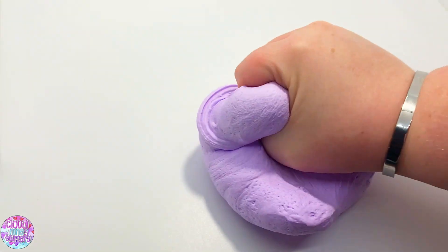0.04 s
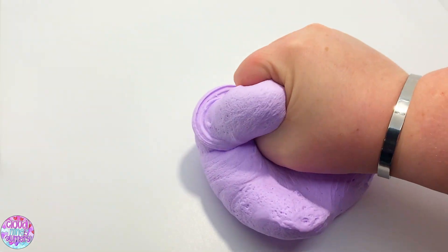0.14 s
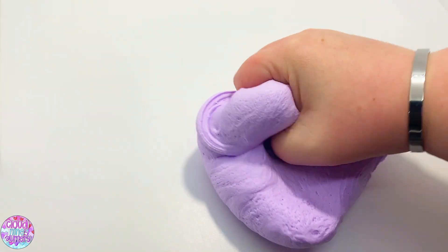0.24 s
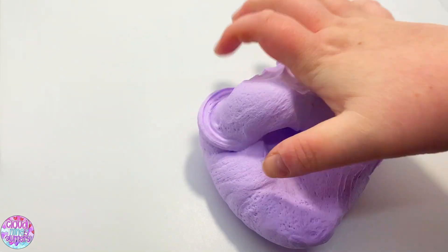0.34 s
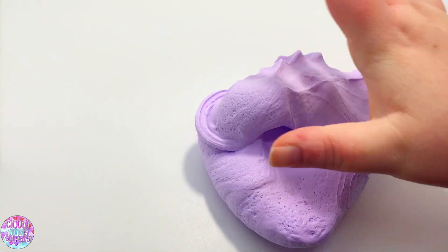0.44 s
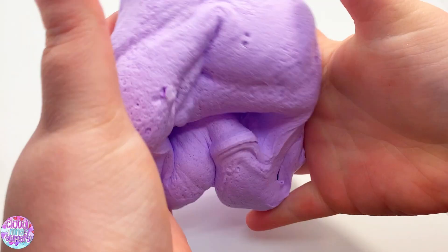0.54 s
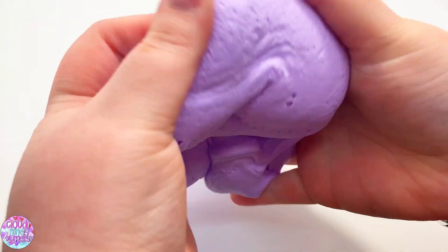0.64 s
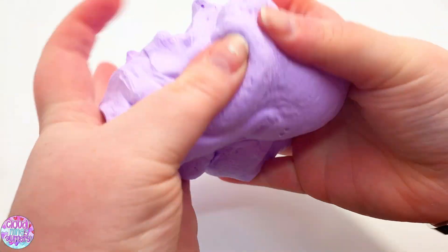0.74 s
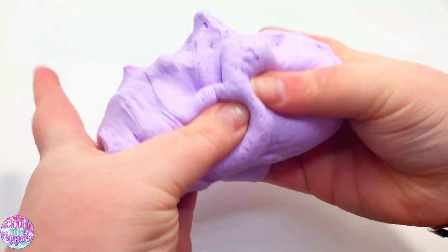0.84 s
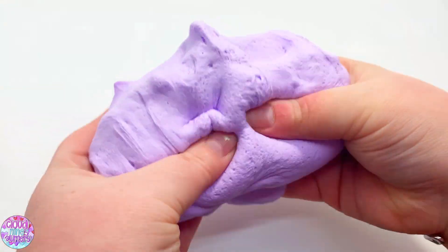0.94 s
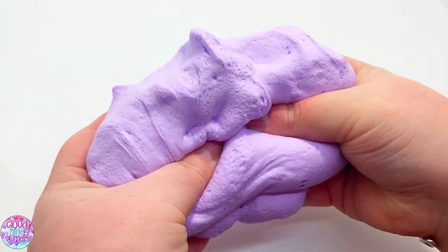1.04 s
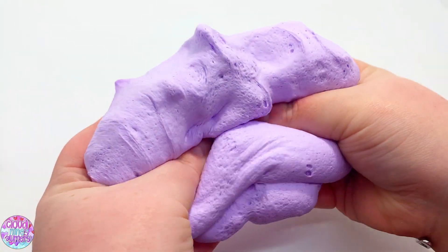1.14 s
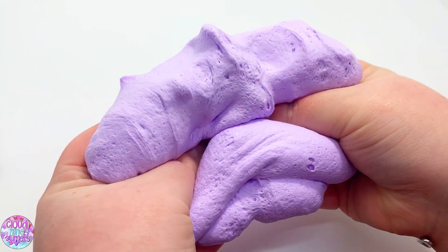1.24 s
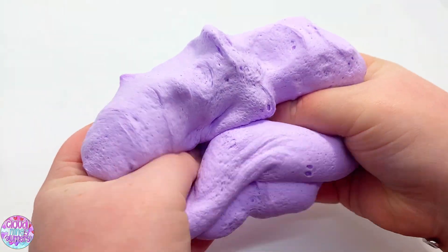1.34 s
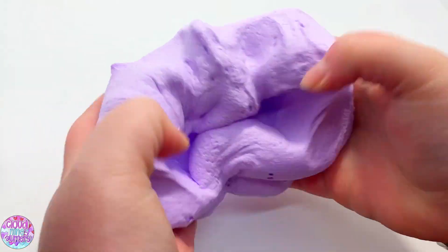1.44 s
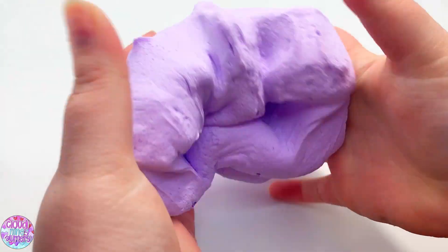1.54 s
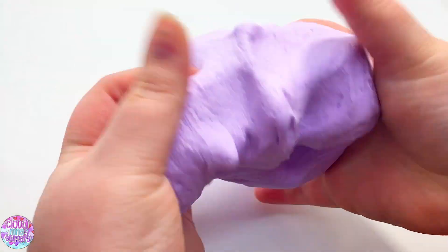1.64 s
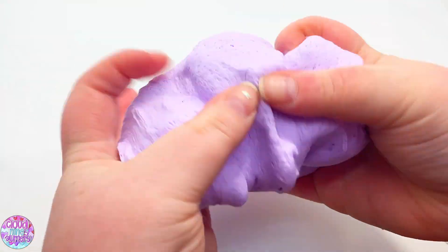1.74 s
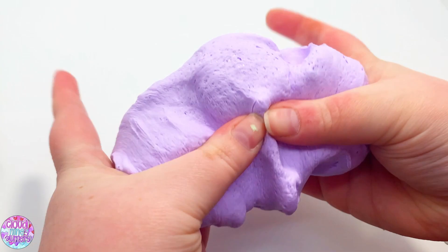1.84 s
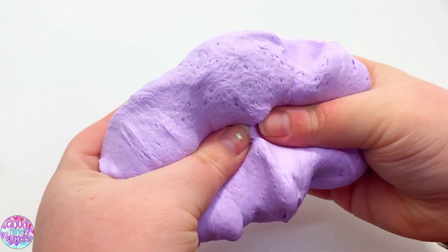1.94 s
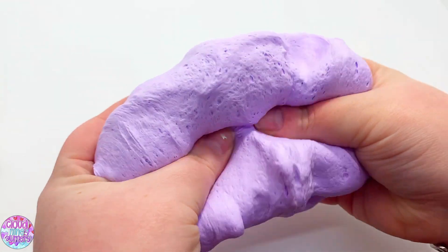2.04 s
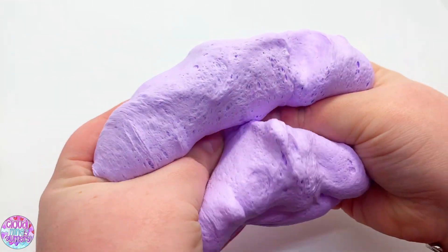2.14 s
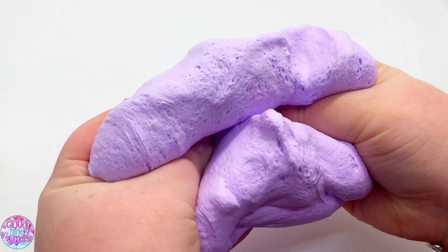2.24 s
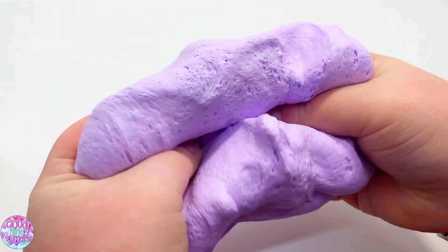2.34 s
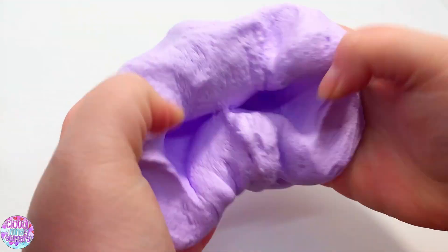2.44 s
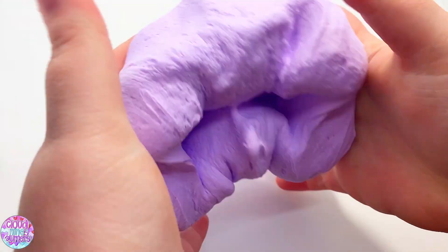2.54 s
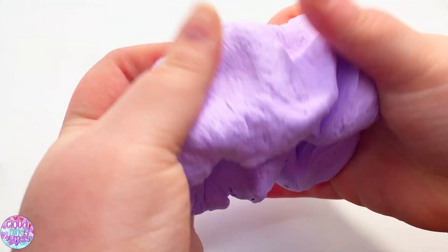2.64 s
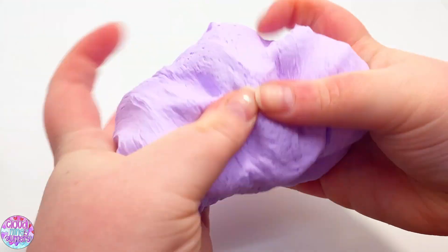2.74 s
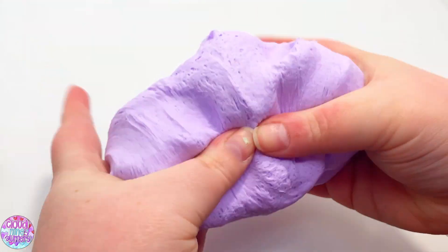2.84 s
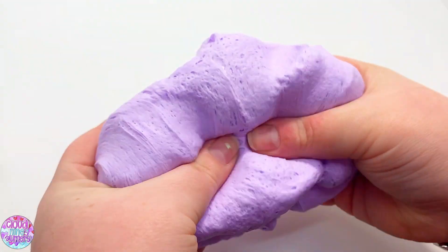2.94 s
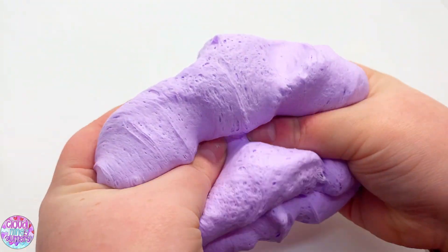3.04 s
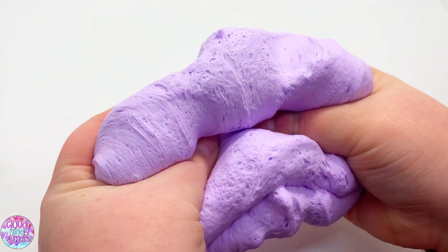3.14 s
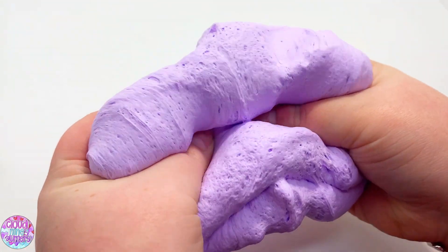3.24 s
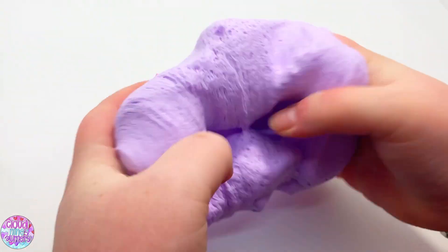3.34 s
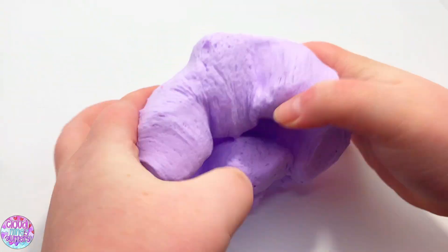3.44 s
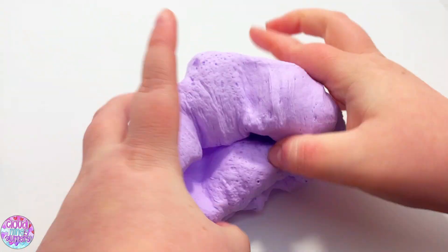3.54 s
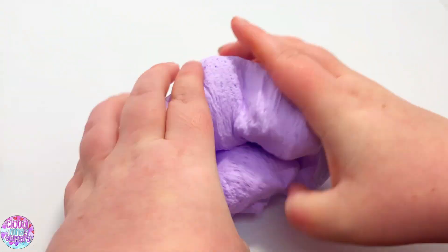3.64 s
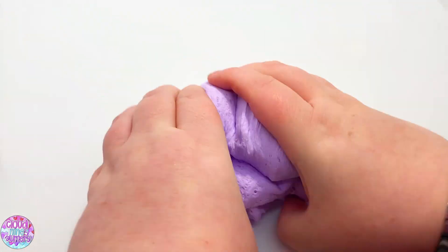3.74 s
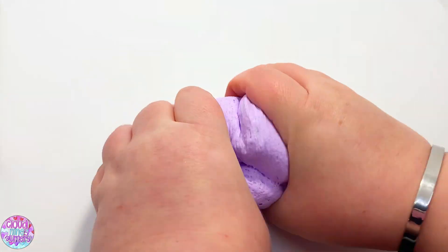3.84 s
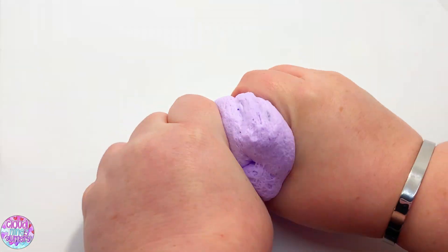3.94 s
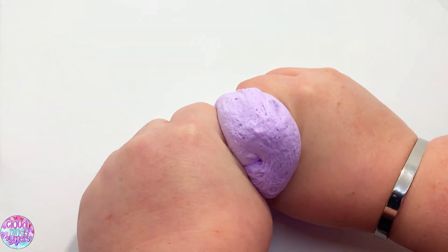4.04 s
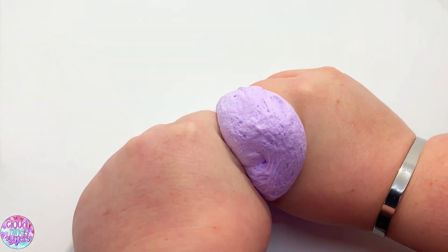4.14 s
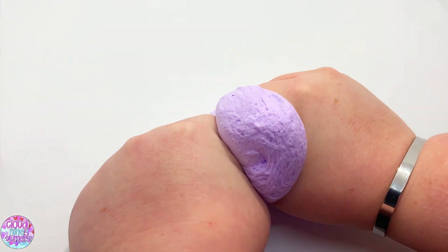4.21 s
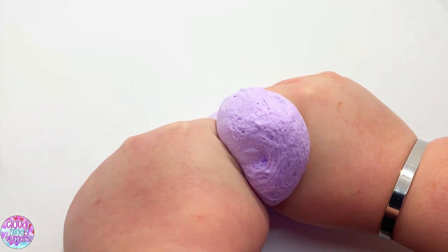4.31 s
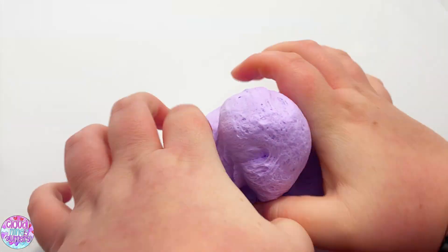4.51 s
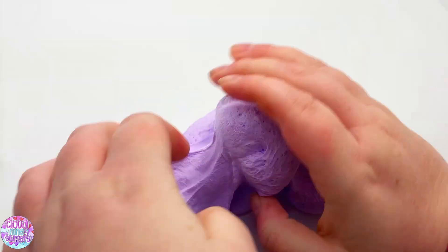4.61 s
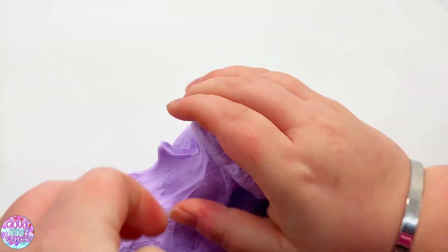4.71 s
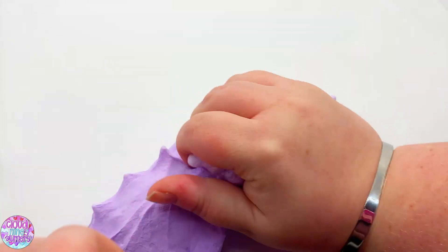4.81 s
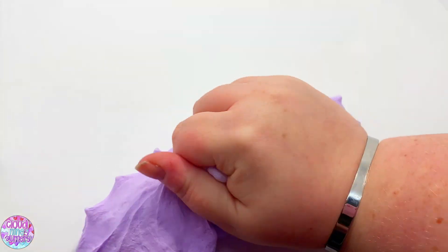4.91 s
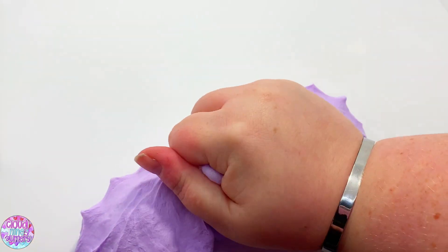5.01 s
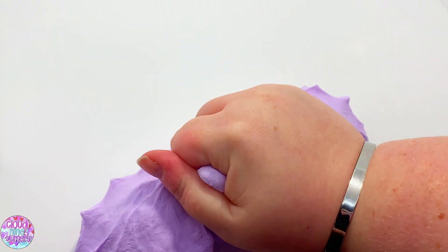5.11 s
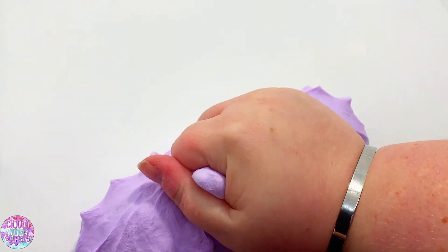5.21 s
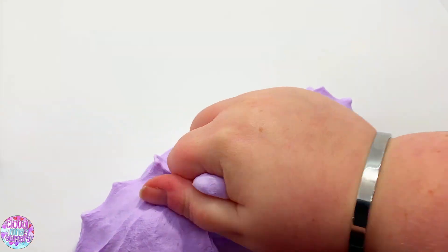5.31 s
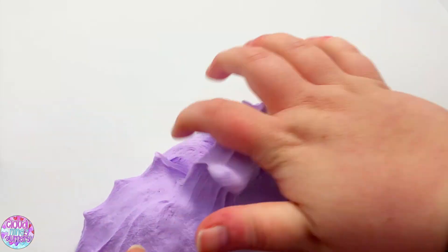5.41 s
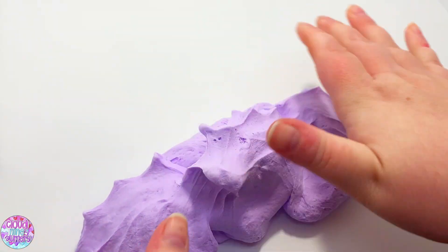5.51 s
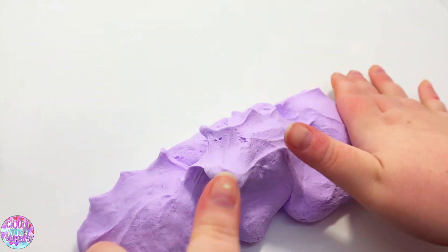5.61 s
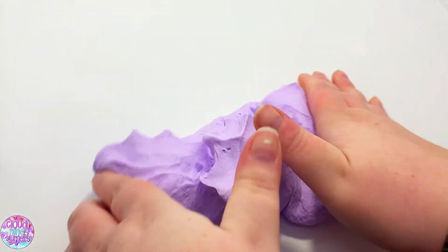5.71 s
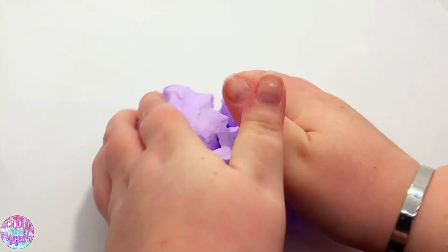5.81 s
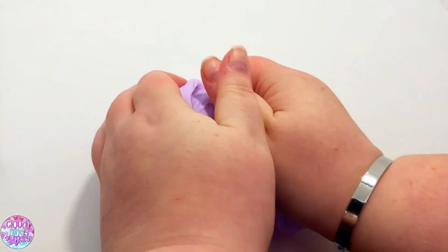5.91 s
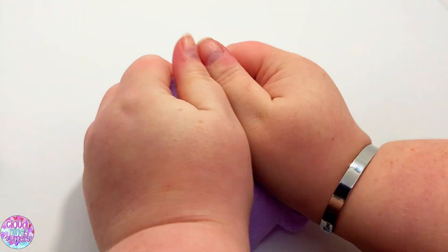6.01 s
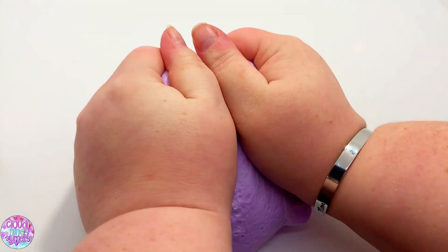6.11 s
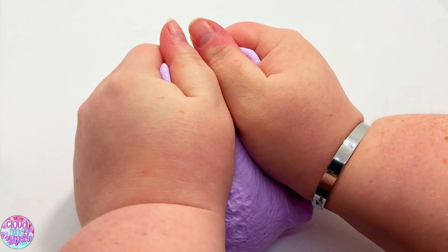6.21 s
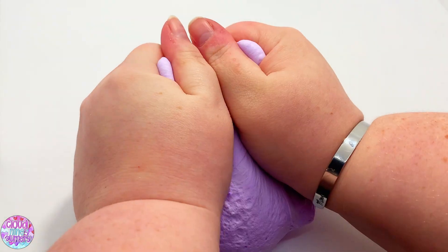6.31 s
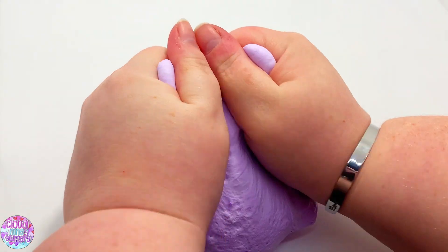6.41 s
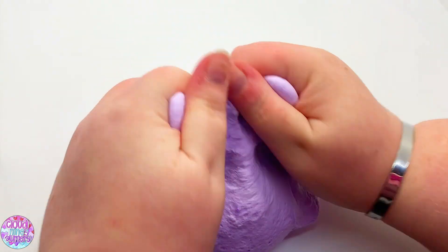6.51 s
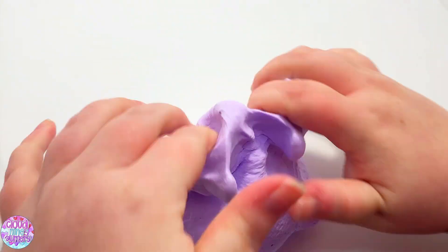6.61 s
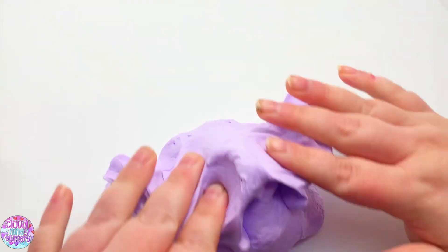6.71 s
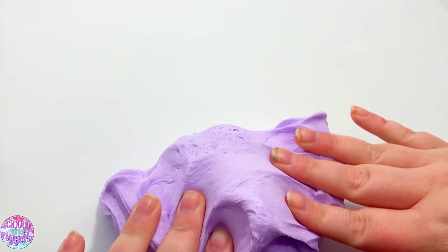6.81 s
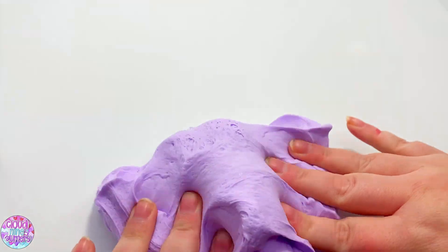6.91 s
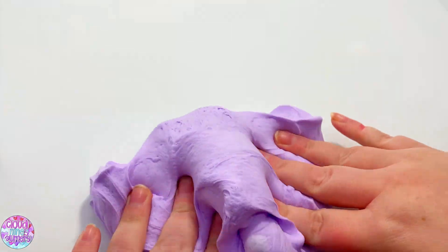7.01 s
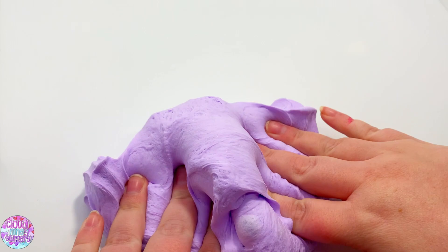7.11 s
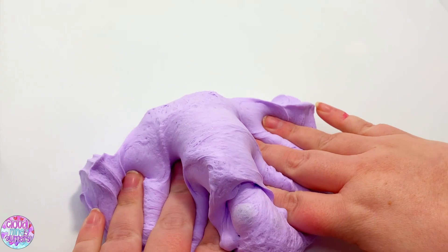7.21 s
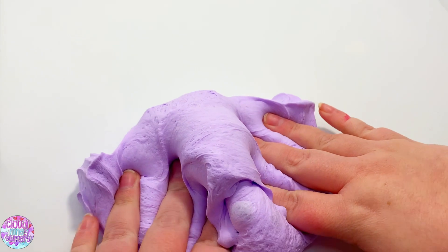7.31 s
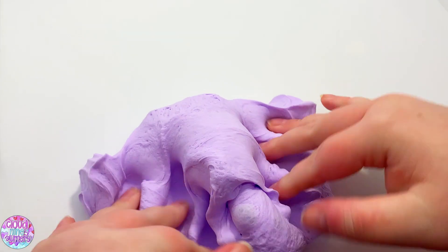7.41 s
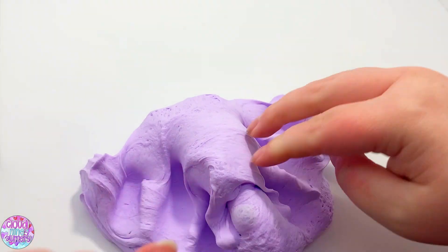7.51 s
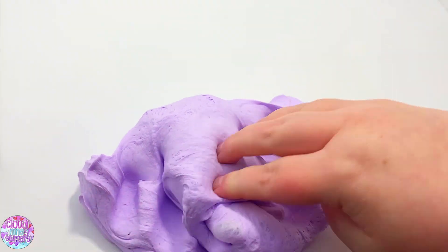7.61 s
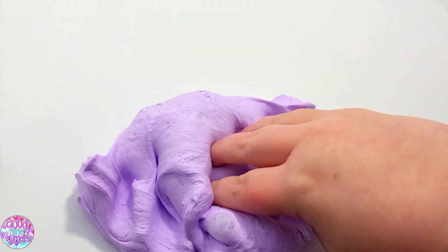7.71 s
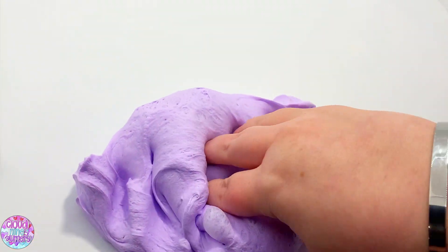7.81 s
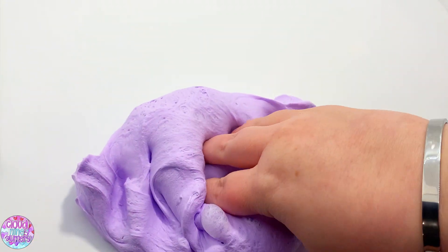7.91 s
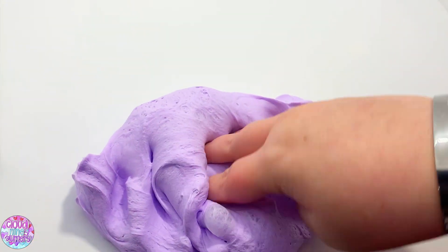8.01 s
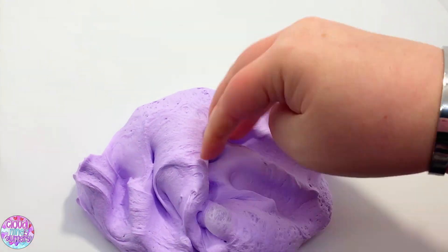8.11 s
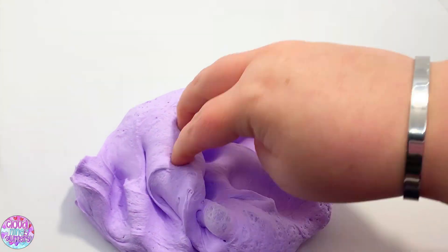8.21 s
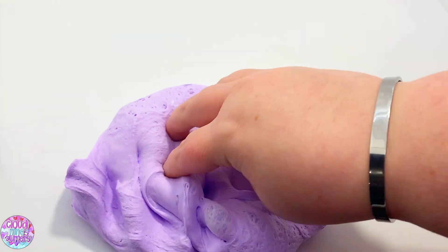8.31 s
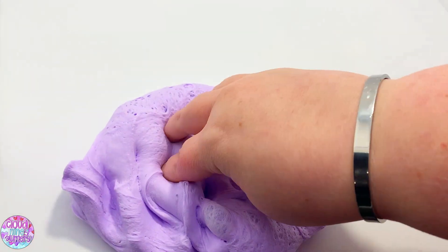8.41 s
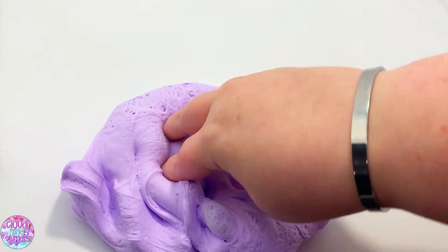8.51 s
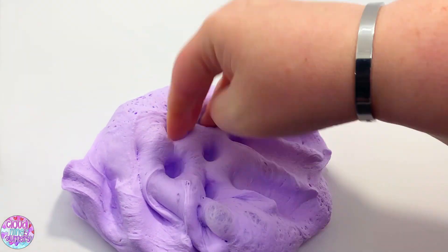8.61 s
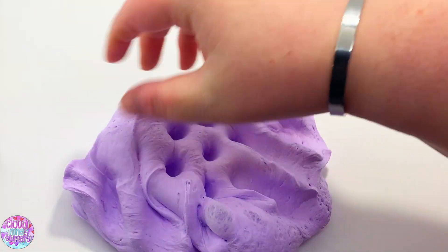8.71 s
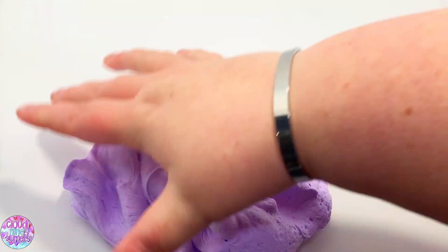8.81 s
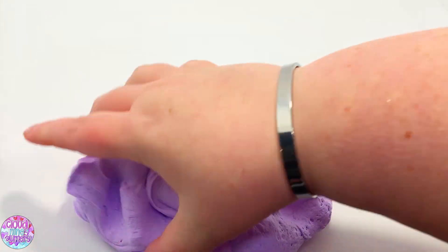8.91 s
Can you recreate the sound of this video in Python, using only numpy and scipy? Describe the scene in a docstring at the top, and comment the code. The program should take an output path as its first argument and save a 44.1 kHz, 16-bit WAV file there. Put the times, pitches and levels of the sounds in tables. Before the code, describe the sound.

Soft airy slime squeezed and kneaded close up, with fizzy crackles, wet squelches and sharp little bubble pops over a faint low room hum.

```python
"""On a table top in a quiet, humming room: hands knead soft airy slime close by, heard in wide stereo.
Squeezing fizzes with filtered noise broken up by random cell bursts, and sticky skin peels with the same bursts.
Larger pockets pop as ragged noise clicks with a short ring of air; cavities squelch as wavering low noise.
Decaying sines make the thuds on the table and the gulps of closing cavities. Unsteady mains tones and a low
rumble lie underneath, and the walls answer the slime with a short noise tail."""
import sys
import numpy as np
from scipy import signal
from scipy.fft import rfft, irfft, next_fast_len
from scipy.io import wavfile
from scipy.ndimage import uniform_filter1d, map_coordinates

SR = 44100
rng = np.random.default_rng(int(sys.argv[2]) if len(sys.argv) > 2 else 0)


def put_to_file(sound):
    """Save the sound as 16-bit audio at rate SR, in the file named by the first command-line argument."""
    columns = np.atleast_2d(sound).T  # one column per channel
    safe = np.clip(columns, -1, 1)
    whole_steps = np.round(safe * 32767)
    wavfile.write(sys.argv[1], SR, whole_steps.astype(np.int16))


N = 394694

# colour of the tiny bursting cells: freq_hz, relative_level_db
FIZZ_COLOUR = [(7400, -32.5), (8000, 5.5), (8900, 1.5), (10200, 3.5), (12000, 6), (15600, 0),
               (16000, -41.5)]
# colour of dry skin coming unstuck: freq_hz, relative_level_db
PEEL_COLOUR = [(500, -43), (1000, -8.5), (2000, -6.5), (3600, -0.5), (5500, -2.5), (7600, 3.5),
               (8600, -41.5)]
# colour of wet peeling and of big pockets: freq_hz, relative_level_db
WET_COLOUR = [(500, -10.5), (1000, 0), (2200, -1.5), (4000, -5), (8200, -24)]
# low colour of closing cavities: freq_hz, relative_level_db
SQUELCH_COLOUR = [(120, -3.5), (190, 3), (290, -6), (450, 1), (700, -16.5), (1200, -23.5)]


def amp(db):
    """Gain of a level in dB."""
    return 10 ** (np.asarray(db) / 20)


def unit(x):
    """x at rms 1."""
    return x / np.sqrt(np.mean(x ** 2) + 1e-20)


def along(points, hz):
    """Values of (Hz, value) points read on a log frequency axis."""
    f, v = np.transpose(points)
    return np.interp(np.log(hz + 1), np.log(f + 1), v)


def curves(rows):
    """One value per sample for each column after the time."""
    s, *cols = np.transpose(rows)
    return [np.interp(np.arange(N) / SR, s, c) for c in cols]


def wobble(rate):
    """A smooth random curve through normal draws, rate knots a second."""
    knots = rng.standard_normal(int(N * rate / SR) + 4)
    return map_coordinates(knots, [np.arange(N) * rate / SR])


def filtered(x, response):
    """x shaped by a complex response of frequency."""
    m = next_fast_len(N + 8192)
    return irfft(rfft(x, m) * response(np.fft.rfftfreq(m, 1 / SR)), m)[..., :N]


def noise(colour):
    """Coloured noise of rms 1."""
    return unit(filtered(rng.standard_normal(N), lambda hz: amp(along(colour, hz))))


def fading(ticks, t60):
    """Every tick leaves a tail that falls by 60 dB in t60 seconds."""
    return signal.lfilter([1], [1, -amp(-60 / (t60 * SR))], ticks)


def crackle(rate, spread_db, t60, bed):
    """Envelope of rms 1: random cells burst (rate a second), few large and many small, over a steady bed."""
    chance, size = rng.random(N), rng.exponential(1, N)
    bursts = (chance < rate / SR) * amp(spread_db * np.minimum(size, 2.8))
    return unit(bed + unit(fading(bursts, t60)))


def effort():
    """Levels of fizz, peel, squelch in dB: each squeeze rises, sags or swells while held, is let go and settles."""
    # slow creep of the slime between squeezes, ahead of the layer gains: time_s, fizz_level_db
    creep = [(0, -65.5), (.44, -97), (.5, -65), (.72, -62), (1.6, -73), (1.8, -60.5), (2.22, -62.5),
             (3.18, -84), (3.62, -60.5), (4.66, -75.5), (5.9, -62.5), (7.1, -63.5), (7.23, -85),
             (7.88, -77.5), (8.2, -64), (8.45, -76), (8.95, -103)]
    # squeezes, pokes and pulls, levels ahead of the layer gains: full_strength_s, rise_s, length_s,
    # sag_db_per_s (of fizz and peel, negative swells), fizz_level_db, peel_level_db, squelch_level_db
    squeezes = [(0.031, 0.087, 0.012, 57, -46, -73, -101), (0.191, 0.03, 0.1, 85, -40.5, -39, -41.5),
                (0.657, 0.024, 0.035, 98, -45, -51.5, -50.5), (1.338, 0.067, 0.022, 56, -41.5, -45, -45),
                (1.378, 0.045, 0.13, 34, -51, -72, -85), (1.497, 0.063, 0.0255, 48, -52, -48.5, -48.5),
                (1.695, 0.22, 0.095, 22, -53, -59, -55.5), (2.316, 0.027, 0.2, 62.5, -42.5, -44.5, -44.5),
                (2.671, 0.13, 0.023, 61, -49, -54.5, -53), (2.861, 0.162, 0.26, 36, -56.5, -61.5, -77.5),
                (3.262, 0.039, 0.28, 64, -40.5, -42.5, -41.5), (3.801, 0.22, 0.53, 36.5, -46.5, -53, -62),
                (4.036, 0.063, 0.084, 78, -37, -49, -63.5), (4.371, 0.1, 0.1, 79.5, -37, -37, -38.5),
                (4.782, 0.075, 0.25, -8, -46.5, -53.5, -62), (5.092, 0.024, 0.041, 108, -42, -60, -70),
                (5.227, 0.018, 0.046, 21, -39.5, -49, -54), (5.311, 0.075, 0.082, 127.5, -42.5, -44, -45),
                (5.459, 0.01, 0.048, 69, -86, -49, -51.5), (5.63, 0.21, 0.16, 52, -50.5, -47, -54),
                (5.886, 0.018, 0.14, 91, -45.5, -52, -62.5), (6.043, 0.17, 0.023, 93.5, -36.5, -44.5, -56),
                (6.179, 0.11, 0.015, 44, -42, -47, -59.5), (6.372, 0.021, 0.043, 61.5, -44, -54, -82),
                (6.423, 0.031, 0.24, 71, -41, -42, -45), (6.856, 0.018, 0.028, 56, -49.5, -51.5, -69),
                (7.315, 0.021, 0.058, 90.5, -35, -34, -33.5),
                (8.005, 0.064, 0.046, 101, -42.5, -41.5, -39.5),
                (8.534, 0.0355, 0.042, 46, -46, -39.5, -38), (8.87, 0.047, 0.089, -10, -42.5, -44.5, -47.5)]
    rise_db, release_db_s = 29.5, 507  # climb within the rise time; fall when the fingers let go
    settle_db, settle_db_s = -23, 118.5  # the slime goes on settling, fainter and slower
    sag_factors = np.array([[1], [1], [1.25]])  # the squelch changes faster than the fizz while held
    squelch_lag_s = 0.01  # cavities answer a little after the fizz

    creep_db, = curves(creep)
    # the peel creeps 4 dB below the fizz; the resting squelch is steady and faint
    resting_db = np.array([creep_db, creep_db - 4, np.full(N, -69.5)])
    power = amp(2 * resting_db)
    for s, rise, length, sag, *levels in squeezes:
        at = slice(max(round((s - 2 * rise) * SR), 0), round((s + length + .5) * SR))
        t = np.arange(N)[at] / SR - s
        after = np.maximum(t - length, 0)
        climb_db = rise_db * np.minimum(t, 0) / rise
        held_db = climb_db - sag_factors * sag * np.clip(t, 0, length)
        let_go_db = np.maximum(-release_db_s * after, settle_db - settle_db_s * after)
        power[:, at] += amp(2 * (np.array(levels)[:, None] + held_db + let_go_db))
    power[2] = np.interp(np.arange(N) - squelch_lag_s * SR, np.arange(N), power[2])
    return 10 * np.log10(power)


def patchy(x, depth_db):
    """Cavities open and close: coloured patches of gain drift through the sound, back at rms 1."""
    z = signal.stft(x, nperseg=512)[2]
    field = uniform_filter1d(rng.standard_normal(z.shape), size=5, axis=0)  # smooth across pitch
    field = uniform_filter1d(field, size=7, axis=1)  # and along time
    return unit(signal.istft(z * amp(depth_db * unit(field)), nperseg=512)[1][:N])


def kneading():
    """Fizz and peel share the same cell bursts; where fizz is weak beside peel, the peel turns wet and dark."""
    fizz_db, peel_db, squelch_db = effort()
    ticks = crackle(rate=70, spread_db=3.3, t60=.008, bed=.6)
    wet = np.clip(.6 - (fizz_db - peel_db) / 14, 0, 1)
    lumps = amp(2.2 * wobble(90))
    cells = wet * lumps + (1 - wet) * ticks  # wet slime slides in coarse lumps, dry slime ticks
    fizz = amp(fizz_db + 4.0) * cells * noise(FIZZ_COLOUR)
    skin = np.sqrt(wet) * noise(WET_COLOUR) + np.sqrt(1 - wet) * noise(PEEL_COLOUR)
    peel = amp(peel_db + 2.5) * cells * patchy(skin, depth_db=2.5)
    squelch = amp(squelch_db + 4.15 * wobble(60)) * noise(SQUELCH_COLOUR)
    return fizz, peel + squelch


def room_tone():
    """Unsteady mains tones over a rumble, nearly alike in both channels; now and then it all dips."""
    # mains hum and its overtones: pitch_hz, relative_level_db
    mains = [(60, -6.5), (120, -6), (180, -18)]
    # colour of the low rumble: freq_hz, relative_level_db
    rumble = [(20, -16.5), (59, 0.5), (91, -15.5), (129, -10), (290, -37.5), (467, -39), (750, -52.5)]
    # moments when the level dips briefly: centre_s
    hum_dips = [0.0, 1.43, 2.78, 4.15, 4.28, 5.18, 6.31, 6.82]
    dip_db, dip_s = -23, 0.048  # depth and half width of a dip
    t = np.arange(N) / SR
    tones = np.zeros(N)
    for hz, db in mains:
        level = amp(db + 3 * wobble(5.1))
        tones += level * np.sin(2 * np.pi * hz * t + 0.46 * wobble(8.3))
    shared = tones + amp(-1.5) * noise(rumble)
    apart = amp(-13.5) * noise(rumble)  # opposite in the two channels
    dips = sum(dip_db * np.exp(-((t - s) / dip_s) ** 2) for s in hum_dips)
    return amp(-55.0 + dips + 0.73 * wobble(2.7)) * np.array([shared + apart, shared - apart])


def pops():
    """A pocket snaps, tears open in a ragged volley of clicks, and the air inside rings for a few cycles."""
    # bursting air pockets, levels ahead of the layer gains:
    # start_s, skin_level_db, body_level_db (against the skin), air_pitch_hz (at the onset)
    pockets = [(0.2014, -31.5, -5, 1240), (0.4857, -31, -19.5, 6460), (0.6614, -33.5, -27, 2660),
               (0.79, -40, -2.5, 4060), (1.314, -26.5, -9.5, 5070), (1.486, -28, -17.5, 1610),
               (1.6103, -36.5, 1.5, 2980), (1.817, -26, -31.5, 1970), (2.162, -28, -10.5, 5860),
               (2.324, -13.5, -14.5, 6160), (2.9533, -31, -5, 4220), (3.628, -27.5, -15, 2380),
               (3.665, -24, -16, 1520), (3.776, -31.5, -11, 5000), (3.797, -19, -11, 6600),
               (3.8594, -33.5, -3, 1350), (3.884, -19.5, -27, 4280), (3.953, -24.5, -39, 4620),
               (4.028, -11, -16.5, 6600), (4.065, -23, -20.5, 4840), (4.088, -19.5, -26, 6860),
               (4.155, -24.5, -37, 6000), (4.213, -4.5, -28, 5230), (4.228, 0, -22.5, 6040),
               (4.33, -28.5, -11, 2880), (4.362, -16, -24, 1690), (4.481, -23, -2, 3470),
               (4.5829, -33.5, -4.5, 3760), (4.771, -26.5, -6, 4700), (4.809, -18, -17.5, 2230),
               (4.818, -24, 0, 6880), (4.852, -18, -15.5, 3520), (4.8713, -17, -17.5, 5750),
               (4.897, -16.5, -15.5, 6500), (4.918, -25, -12.5, 5000), (4.94, -11.5, -11.5, 6600),
               (4.977, -19.5, -14.5, 7400), (5.003, -18, -14.5, 3600), (5.03, -29, -3, 4300),
               (5.0421, -17, -11.5, 3800), (5.0754, -14.5, -15.5, 4430), (5.132, -17, -20.5, 5500),
               (5.2055, -25.5, -24.5, 1400), (5.234, -26, -11.5, 3550), (5.312, -13.5, -21.5, 4120),
               (5.456, -44, 0.5, 2940), (5.8592, -22, -16, 4020), (6.0241, -21.5, -43, 6690),
               (6.1337, -20, -21, 6920), (6.17, -28, -18.5, 6580), (6.1874, -25, -7, 2870),
               (6.23, -6.5, -20, 1390), (6.2932, -21.5, -25, 5580), (6.377, -18, -26.5, 3560),
               (6.3898, -14.5, -11.5, 7140), (6.425, -22.5, -2.5, 3170), (6.6606, -21, -24.5, 2100),
               (6.7302, -28.5, -6.5, 6030), (6.9622, -44, 11, 1610), (7.3053, -17.5, -10.5, 3530),
               (7.391, -21, -12, 3820), (7.8707, -41.5, -25, 6000), (7.957, -20.5, -17, 3830),
               (7.979, -17, -35.5, 3430), (8.003, -20, -14.5, 2900), (8.024, -19.5, -8.5, 1840),
               (8.18, -36.5, -13.5, 5000), (8.318, -36.5, -21, 5900), (8.516, -17.5, -6.5, 3360),
               (8.535, -25, -3.5, 1390), (8.5614, -18, -6.5, 2298), (8.8612, -27.5, 3.5, 3640)]
    big_hz = 2300  # pockets that ring below this are big
    skin, dry_body, wet_body, air = np.zeros((4, N + SR))
    t = np.arange(SR // 8) / SR
    fall = amp(-60 * t / 0.021) + 0.26 * amp(-60 * t / 0.058)  # a quick fall and a fainter, longer one
    tear = fall * (1 - np.exp(-t / 0.0015)) ** 2
    for s, db, body_db, hz in pockets:
        at = slice(round(s * SR), round(s * SR) + len(t))
        skin[at] += amp(db) * tear
        body_layer = wet_body if hz < big_hz else dry_body
        body_layer[at] += amp(db + body_db) * tear
        swell = 1 - np.exp(-t * hz / 0.19)
        glide = np.sin(2 * np.pi * hz * t * (1 + 8 * t))  # pitch climbs as it rings
        blip = amp(-60 * t * hz / 12) * swell * glide
        air[at] += amp(db + body_db + 9.5) * np.roll(blip, SR // 500)  # 2 ms on, once the skin has torn
    ragged = crackle(rate=1100, spread_db=9.0, t60=0.0012, bed=2.9)
    hollow = noise(WET_COLOUR) + amp(-3.0) * noise(SQUELCH_COLOUR)  # big pockets add a low knock
    body = dry_body[:N] * noise(PEEL_COLOUR) + wet_body[:N] * hollow
    snap = amp(-3.5) * skin[:N] * ragged * noise(FIZZ_COLOUR)
    knock = amp(2.5) * ragged * body + air[:N]
    return snap, knock


def thuds():
    """Soft loads on the table and closing cavities swell within a fraction of a cycle and ring briefly."""
    # the lump and the hands load the table top: start_s, level_db (ahead of the common gain), pitch_hz
    loads = [(1.492, -50, 210), (1.752, -53.5, 171), (4.409, -42.5, 116), (5.314, -49.5, 183),
             (5.334, -47.5, 92), (5.567, -44, 135), (6.964, -47, 200), (7.319, -46, 143),
             (8.016, -51.5, 92), (8.601, -44, 80.6), (8.838, -49.5, 109)]
    # a cavity closes: start_s, level_db (ahead of the common gain), pitch_hz
    gulps = [(0.202, -39.5, 404), (2.329, -46.5, 430), (3.269, -48.5, 454), (4.355, -46, 420),
             (4.367, -44, 493), (7.323, -42, 460)]
    ring_cycles = 13.5  # cycles to die by 60 dB
    table, t = np.zeros(N + SR), np.arange(SR // 4) / SR
    for s, db, hz in loads + gulps:
        decay = amp(db + 14.5 - 60 * t * hz / ring_cycles)
        swell = 1 - np.exp(-t * hz / 0.27)
        table[round(s * SR):][:len(t)] += decay * swell * np.sin(2 * np.pi * hz * t)
    return table[:N]


def stereo_image(treble, body):
    """Treble is later on the left, the body's lows later on the right, its highs spread by random phase."""
    # random phase spread between left and right: freq_hz, spread_rad
    scatter = [(600, 0.57), (1300, 2.59)]
    # balance of the body, left over right: freq_hz, level_db
    left_db = [(500, -1), (1800, 3.5), (6000, -1.5)]
    treble_lag_s, in_step_hz = 1 / 3200, 10120  # left behind right; the pitch at which both are in phase
    image_lags_s = (.0002, .0017)  # right behind left, before and after the image changes
    lag_top_hz = 1000  # the body's phase lag grows only up to this pitch
    image_change_s = 4.4  # from here on the lows sit wider

    def treble_turn(hz):
        return np.exp(1j * np.pi * treble_lag_s * (hz - in_step_hz) * np.array([[-1], [1]]))

    def body_turn(hz):
        return np.exp(-2j * np.pi * np.outer(image_lags_s, np.minimum(hz, lag_top_hz)))

    early_image, late_image = filtered(body[None], body_turn)
    right = np.where(np.arange(N) < image_change_s * SR, early_image, late_image)
    hz, _, z = signal.stft([body, right], SR, nperseg=128)
    field = uniform_filter1d(rng.standard_normal(z.shape[1:]), size=4, axis=0)
    field = unit(uniform_filter1d(field, size=40, axis=1))
    # each channel takes half of the spread and half of the balance
    half = np.exp(.5j * along(scatter, hz)[:, None] * field) * amp(along(left_db, hz) / 2)[:, None]
    body_pair = signal.istft(z * [half, 1 / half], SR, nperseg=128)[1][:, :N]
    return filtered(treble[None], treble_turn) + body_pair


def walls(x):
    """Each frequency of the room's answer dies at its own speed, differently in each channel."""
    # decay of the room: freq_hz, t60_s
    room = [(200, 0.097), (2000, 0.082), (12000, 0.056)]
    hz, t, z = signal.stft(rng.standard_normal((2, SR // 3)), SR, nperseg=256)
    tail = signal.istft(z * amp(-60 * t / along(room, hz)[:, None]), SR, nperseg=256)[1]
    delayed = np.pad(x, (130, 0))  # samples, about 3 ms before the tail starts
    return signal.fftconvolve(delayed[None], tail / np.linalg.norm(tail[0]), axes=1)[:, :N]


def scene():
    """Slime in the hands, table, walls and room tone."""
    fizz, peel = kneading()
    snap, knock = pops()
    treble, body = fizz + snap, peel + knock
    thinned = filtered(body, lambda hz: hz ** 2 / (hz ** 2 + 500 ** 2))  # the walls get less of the lows
    answer = walls(amp(-15.0) * treble + amp(-7.5) * thinned)
    return stereo_image(treble, body) + thuds() + answer + room_tone()


def record(dry):
    """The microphones lose the deepest bass; the recorder keeps nothing above its band limit."""
    top_hz = 16634
    return filtered(dry, lambda hz: (hz < top_hz) * hz ** 2 / (hz ** 2 + 30 ** 2))


dry = scene()
out = record(dry)
put_to_file(out)
```